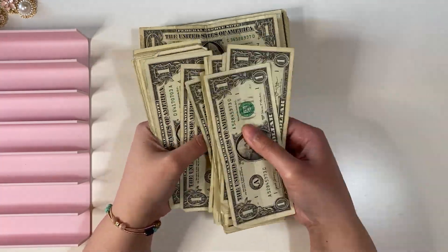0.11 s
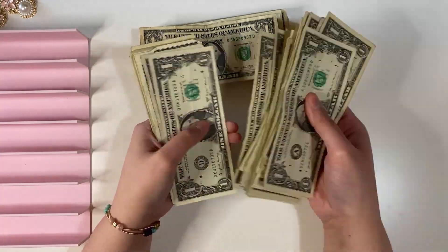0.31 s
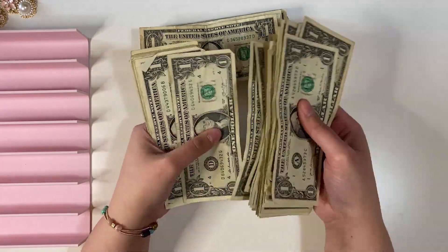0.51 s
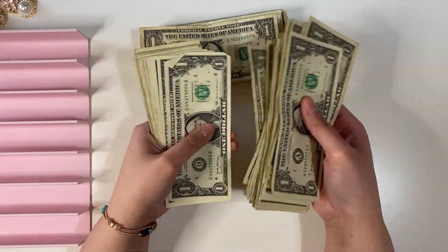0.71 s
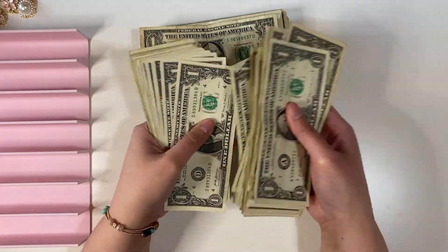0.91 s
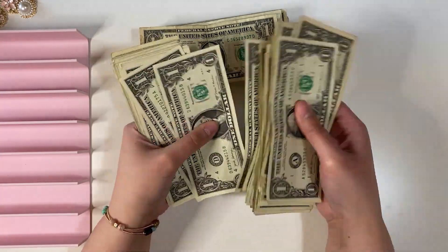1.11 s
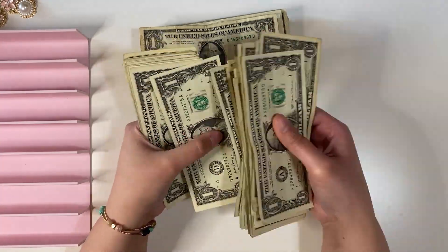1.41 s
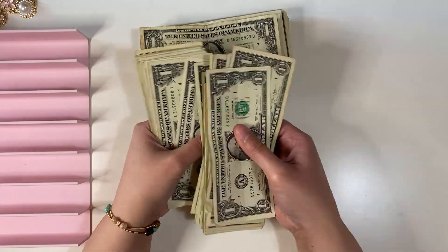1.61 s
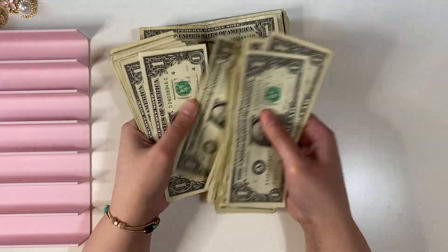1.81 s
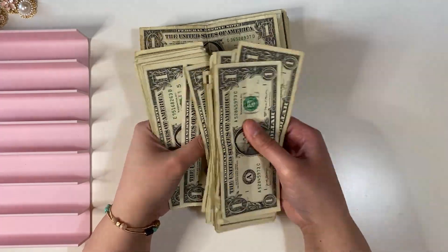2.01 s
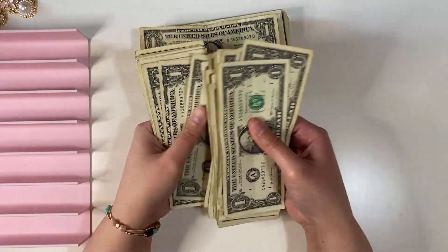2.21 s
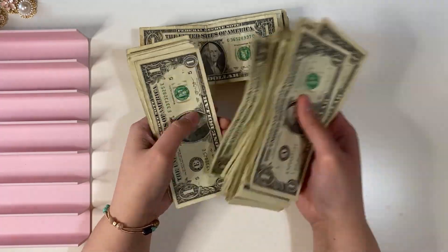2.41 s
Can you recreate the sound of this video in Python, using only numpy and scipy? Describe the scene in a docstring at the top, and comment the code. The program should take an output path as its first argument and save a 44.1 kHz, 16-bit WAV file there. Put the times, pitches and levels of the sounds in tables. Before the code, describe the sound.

Worn paper banknotes are thumbed from hand to hand, close by, each sliding with a soft grainy rustle and snapping free with a short flap. Flicks come at about 0.2, 0.35, 0.55 and 0.9 seconds, then lighter sliding, then flicks roughly every 0.2 seconds from 1.5 to 2.3. Brief paper buzzes and soft handling thuds mix in, over a small room's faint echo and low rumble.

```python
"""A grainy rustle and a short papery flap: worn banknotes are thumbed from hand to hand at an
uneven pace, often about 0.2 s apart. Notes rustle as they slide over the stack and flap as they snap
free, with brief buzzes of buckling paper and soft thuds of handling. A small room adds a faint echo
and a low rumble. Two closely spaced microphone openings pick it all up."""
import sys
import numpy as np
from scipy import signal
from scipy.fft import rfft, irfft
from scipy.io import wavfile
from scipy.ndimage import uniform_filter1d

SR = 44100
rng = np.random.default_rng(int(sys.argv[2]) if len(sys.argv) > 2 else 0)


def waveform_to_disk(signal):
    """Save audio, clipped to [-1, 1], as 16-bit WAV at the path in sys.argv[1]."""
    frames = np.transpose(np.atleast_2d(signal))
    scaled = np.clip(frames, -1, 1) * 32767
    samples = np.round(scaled).astype(np.int16)
    wavfile.write(sys.argv[1], SR, samples)


N = 114660  # 2.6 s

# Tones of a shaking sheet, its hissing fibres and the dull crack of worn paper: pitch_hz, level_db
FLUTTER_TONE = [(150, -16.5), (550, -10.5), (800, -1.5), (1150, -1.5), (1550, -16), (2200, -18.5),
                (5000, -31)]
HISS_TONE = [(2500, -47), (5000, 2), (7000, 0), (10000, -0.5), (13000, -6.5), (16500, -9.5)]
CRACK_TONE = [(4200, -13.5), (6000, -13.5), (9000, -23.5), (14000, -40)]
# Notes snapping free: peak_s, flap_db, flap_hz, flap_ms, crack_db, crack_hz, tick_db
SNAPS = [ (0.203, -20.5, 1144, 0.95, -31, 1850, -60), (0.2139, -33.5, 1120, 2, -37.5, 2300, -64),
         (0.3386, -23.5, 1240, 1.38, -29, 3230, -30), (0.3394, -21.5, 825, 2.14, -30.5, 2000, -43),
         (0.3726, -41, 1540, 0.49, -36.5, 4150, -31.5), (.5693, -27.5, 1025, 1.6, -44.5, 3030, -70),
         (0.9226, -24, 1280, 0.48, -28, 2900, -34), (0.9245, -25.5, 844, 3.35, -31, 1530, -35),
         (1.5443, -36.5, 1190, 1.5, -38, 2500, -62), (1.5678, -24.5, 1460, 0.5, -21, 4200, -29.5),
         (1.7353, -24, 945, 1, -34.5, 1350, -42.5), (1.7393, -30.5, 1054, 2.9, -41, 2330, -44),
         (1.921, -30, 835, 0.46, -37.5, 1920, -50), (1.9450, -26.5, 1083, 1.35, -34, 2610, -41),
         (1.9565, -39.5, 1110, 1.6, -42.5, 2930, -42), (2.1316, -28, 1300, 0.59, -43, 1910, -77),
         (2.3171, -22.5, 1056, 0.86, -36.5, 2500, -71), (2.3295, -32.5, 1060, 0.95, -47, 2280, -63), ]


def snaps(size=4096):
    """A note springs free: the sheet flaps, puffs air and shivers, its crease cracks, its edge ticks."""
    fall_octaves, puff_s = 0.53, 0.00048
    puff_db, shiver_db, crease_db = -15.5, -14, -8
    crack_lead_s, crack_rise_s, crack_fade_s = 0.00037, 0.00044, 0.0014
    out = np.zeros(N)
    for at, flap_db, flap_hz, flap_ms, crack_db, crack_hz, tick_db in SNAPS:
        start = int(at * SR) - size // 4
        t = (start + np.arange(size)) / SR - at
        age = t * 1000 / flap_ms  # in flap lengths
        noise = rng.standard_normal((3, size))
        # Short bending waves arrive first, so the pitch falls.
        pitch = flap_hz * 2 ** (-fall_octaves * np.tanh(age / 2))
        turns = np.cumsum(pitch) / SR
        flap = np.cos(2 * np.pi * (turns - np.interp(0, t, turns))) * np.exp(-np.abs(age) ** 1.59)
        push = t / puff_s - 2
        puff = 2 * push * np.exp(-push ** 2)
        shiver_shape = np.exp(-np.abs(age - 1) / 2.2) / (1 + np.exp(-2 * np.maximum(age, -10)))
        shiver = burst(colour(noise[0], FLUTTER_TONE), shiver_shape)
        since = t + crack_lead_s
        spike = np.exp(-np.abs(since) / np.where(since < 0, crack_rise_s, crack_fade_s))
        crack = burst(colour(resonance(noise[1], crack_hz, width_octaves=0.56), CRACK_TONE), spike)
        crack += undb(crease_db) * spike * np.sin(2 * np.pi * (crack_hz * t + rng.random()))
        tick = burst(colour(noise[2], HISS_TONE), spike)
        sheet = flap + undb(puff_db) * puff + undb(shiver_db) * shiver
        out[start:start + size] += undb(flap_db) * sheet + undb(crack_db) * crack + undb(tick_db) * tick
    return out


# Tone of paper scraping: pitch_hz, level_db
RASP_TONE = [(600, -18), (1400, -7), (2000, 1.5), (2600, 0), (3200, -4), (3900, 1), (5400, -4.5),
             (7000, -17), (11000, -14.5)]
# Thumbs resting between strokes: middle_s, flutter_and_rasp_dip_db, hiss_dip_db
PAUSES = [(0.115, -23, -32), (0.146, -23, -29), (.48, -10, -11), (.837, -14, -11), (1.119, -13, -17),
          (1.865, -39, -22)]
# Paper sliding over paper: peak_s, fade_ms, flutter_db, hiss_db
SLIDES = [ (.19, 13, -61, -62.5), (0.217, 5.7, -48, -56.5), (0.338, 12, -46.5, -55.5),
          (0.376, 12.2, -65, -58.5), (.533, 9.8, -45, -50), (0.578, 3.8, -45, -55.5),
          (.768, 23.4, -54.5, -57), (1.212, 19.7, -49, -65.5), (1.233, 4.1, -47, -53),
          (1.262, 6.9, -53.5, -68.5), (1.382, 12.5, -55.5, -58.5), (1.42, 10.9, -49.5, -59),
          (1.506, 5.2, -48.5, -58.5), (1.533, 14.6, -50, -58), (1.576, 5.6, -50.5, -48),
          (1.698, 15.3, -58, -63.5), (1.781, 9.5, -51.5, -56), (1.953, 11.4, -45, -52),
          (2.16, 81, -64, -65), (2.227, 5, -50, -54), (2.293, 7, -50.5, -63), (2.332, 6.4, -42.5, -70),
          (2.444, 10.6, -51.5, -71), (2.462, 12.3, -56, -58.5), ]


def slides():
    """Each slide swells and fades; rubbing fibres make the sheet flutter, rasp and hiss."""
    touch_db = (-73, -75.5, -74)  # light touch between slides: flutter, rasp, hiss
    half_pause_s, rise_over_fade = 0.019, 0.65
    t = np.arange(N) / SR
    stick_slip = unit(undb(2.5 * wander(rate_hz=230)))
    dips = undb(sum(db * np.exp(-((t - at) / half_pause_s) ** 2) for at, db, _ in PAUSES))
    hiss_dips = undb(sum(db * np.exp(-((t - at) / half_pause_s) ** 2) for at, _, db in PAUSES))
    touch = undb(1.5 * wander(rate_hz=40))
    layers = (FLUTTER_TONE, dips), (RASP_TONE, dips), (HISS_TONE, hiss_dips)
    out = np.zeros(N)
    for layer, (tone, moving) in enumerate(layers):
        power = (touch * undb(touch_db[layer])) ** 2
        for at, fade_ms, flutter_db, hiss_db in SLIDES:
            level_db = (flutter_db, (flutter_db + hiss_db) / 2, hiss_db)[layer]
            from_peak = np.maximum(t - at, (at - t) / rise_over_fade) / (fade_ms / 1000)
            power += undb(level_db) ** 2 * np.exp(-from_peak ** 1.43)
        out += moving * np.sqrt(power) * colour(fibres(), tone)
    return crinkle(out * stick_slip)


def fibres(clicks_per_s=7000, spread_db=5):
    """Paper fibres catch and let go in a stream of tiny clicks."""
    hit = rng.random(N) < clicks_per_s / SR
    strength = undb(spread_db * np.clip(rng.standard_normal(N), -2, 2))
    return hit * strength * np.sign(rng.standard_normal(N))


def crinkle(x, swing_db=3.5):
    """As the sheet changes shape, each third of an octave swells and fades on its own."""
    thirds = 3 * np.log2(np.fft.rfftfreq(N, 1 / SR) + 1)
    spectrum = rfft(x)
    bands = (irfft(spectrum * np.maximum(1 - np.abs(thirds - k), 0), N) for k in range(19, 44))
    return sum(band * undb(swing_db * wander(rate_hz=90)) for band in bands) / undb(swing_db / 4)


# Buzzes of buckling paper and soft low thuds of handling: peak_s, fade_ms, level_db, pitch_hz
BUZZES_AND_THUDS = [ (0.533, 9.7, -44, 2440), (0.925, 3.9, -46, 356), (1.507, 6.4, -45, 1230),
                    (1.5303, 6.4, -42, 2150), (1.735, 4.6, -41, 512), (1.959, 7.3, -53, 217), ]


def buzzes_and_thuds():
    """Buckling paper buzzes and handling thuds softly, each a brief noise around one pitch."""
    t = np.arange(N) / SR
    out = np.zeros(N)
    for at, fade_ms, level_db, pitch_hz in BUZZES_AND_THUDS:
        ring = resonance(rng.standard_normal(N), pitch_hz, width_octaves=0.33)
        swell = np.exp(-((t - at) * 1000 / fade_ms) ** 2)
        out += undb(level_db) * burst(ring, swell)
    return out


def wall_echo(x, level_db=-27, fade_s=0.18):
    """The walls send back a faint, short echo, different on the left and right."""
    tails = rng.standard_normal((2, N)) * undb(-60 * np.arange(N) / SR / fade_s)
    return undb(level_db) * signal.fftconvolve(x[None], tails / np.linalg.norm(tails[0]))[:, :N]


# Tone of the room's rumble and air: pitch_hz, level_db
ROOM_TONE = [(20, -8.5), (62, 0), (118, -4.5), (165, -12.5), (420, -28.5), (1000, -42), (16000, -59)]


def room_rumble(level_db=-58.5):
    """The quiet room makes a steady, low noise."""
    return undb(level_db) * colour(rng.standard_normal(N), ROOM_TONE)


def undb(db):
    """Turn decibels into a number to multiply by."""
    return 10 ** (np.asarray(db) / 20)


def unit(x):
    """Scale a sound to an average power of 1."""
    return x / np.sqrt(np.mean(x ** 2))


def pitch_curve(points, size):
    """Join (pitch_hz, value) points into a curve across all pitches."""
    hz, value = np.array(points).T
    return np.interp(np.log(np.fft.rfftfreq(size, 1 / SR) + 1), np.log(hz), value)


def colour(x, tone):
    """Shape a sound's lows and highs with a tone table, at power 1."""
    return unit(irfft(rfft(x) * undb(pitch_curve(tone, len(x))), len(x)))


def resonance(noise, hz, width_octaves):
    """Keep mostly the noise near one pitch."""
    octaves = np.log2((np.fft.rfftfreq(len(noise), 1 / SR) + 1) / hz)
    return irfft(rfft(noise) / (1 + (octaves / width_octaves) ** 2), len(noise))


def wander(rate_hz):
    """Glide between random values of typical size 1."""
    step = max(int(SR / rate_hz), 2)
    return unit(uniform_filter1d(rng.standard_normal(N)[np.arange(N) // step], step))


def burst(noise, shape):
    """Make noise follow a loudness shape and carry its energy."""
    return unit(noise * shape) * np.sqrt(np.mean(shape ** 2))


def scene():
    """The notes, their echo and the rumble of the room."""
    paper = slides() + snaps() + buzzes_and_thuds()
    rumble = room_rumble()
    return paper + wall_echo(paper) + rumble


# How far the left microphone opening's wave leads the right: pitch_hz, lead_radians
LEFT_LEAD = [(0, 0), (520, .3), (1640, .1), (3100, .8), (5080, .1), (7300, 3.14), (16000, 11.9)]
# Level between the two openings: pitch_hz, left_minus_right_db
BALANCE = [(60, -1), (300, -7), (1000, -2.9), (2200, -2), (8000, -0.6)]


def record(dry, top_hz=16000):
    """The two openings differ in timing and level; the highest treble is cut."""
    phase = np.interp(np.fft.rfftfreq(N, 1 / SR), *np.array(LEFT_LEAD).T)
    side = np.array([[1], [-1]]) / 2
    gain = undb(side * pitch_curve(BALANCE, N))
    stereo = irfft(rfft(dry) * gain * np.exp(1j * side * phase), N)
    return signal.sosfilt(signal.ellip(8, .2, 70, top_hz, fs=SR, output="sos"), stereo)


dry = scene()
out = record(dry)
waveform_to_disk(out)
```